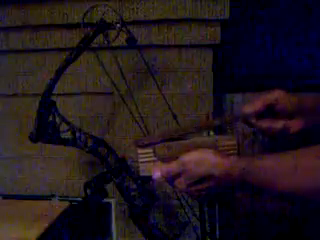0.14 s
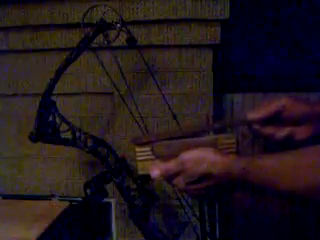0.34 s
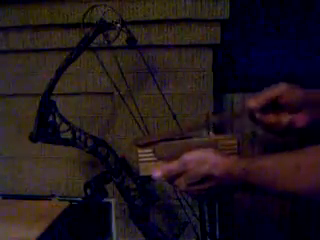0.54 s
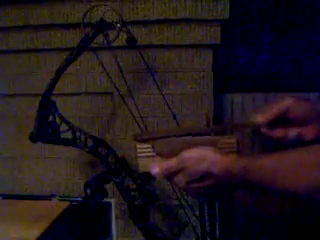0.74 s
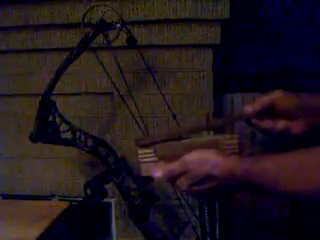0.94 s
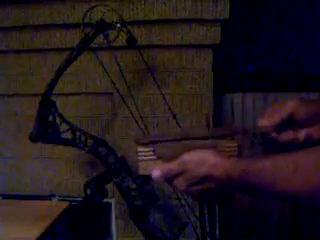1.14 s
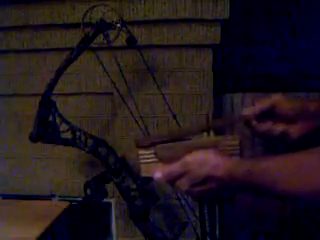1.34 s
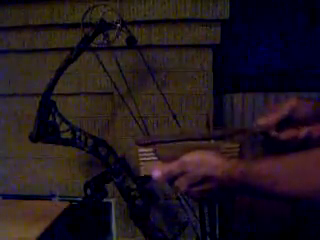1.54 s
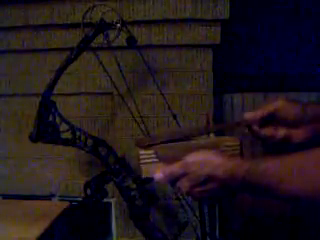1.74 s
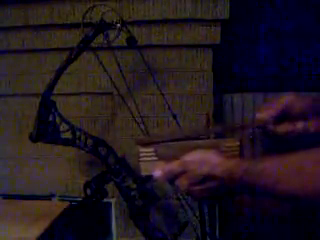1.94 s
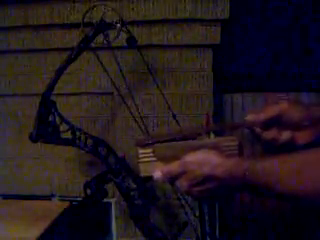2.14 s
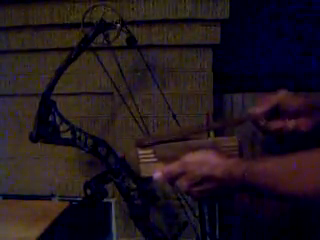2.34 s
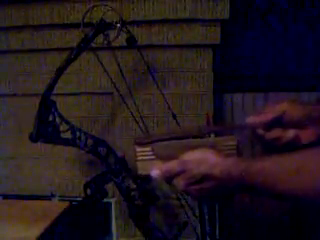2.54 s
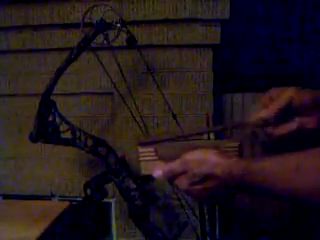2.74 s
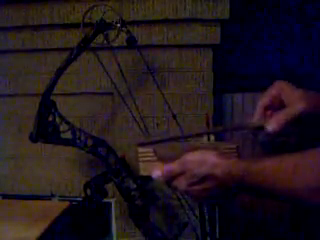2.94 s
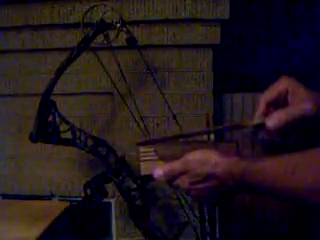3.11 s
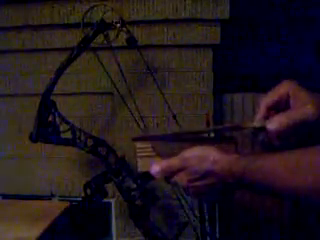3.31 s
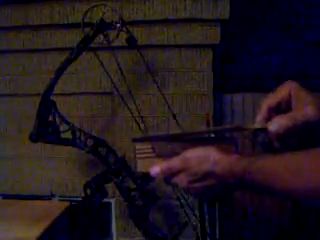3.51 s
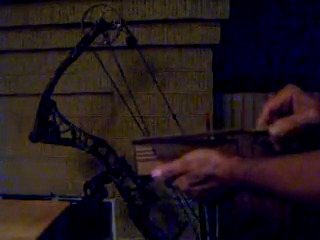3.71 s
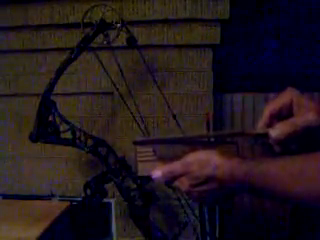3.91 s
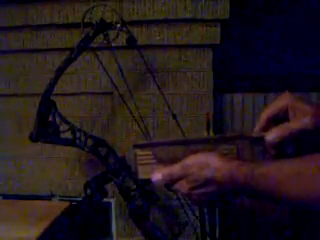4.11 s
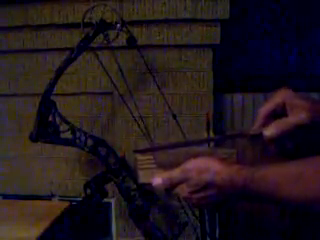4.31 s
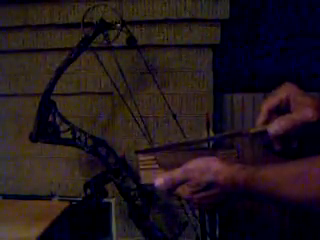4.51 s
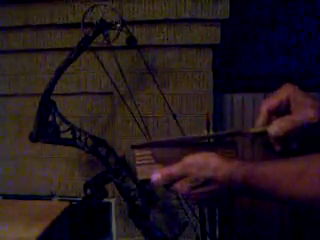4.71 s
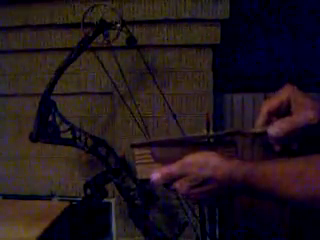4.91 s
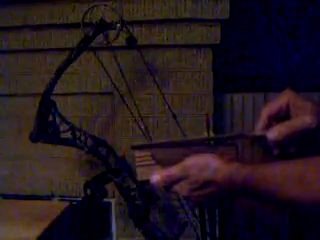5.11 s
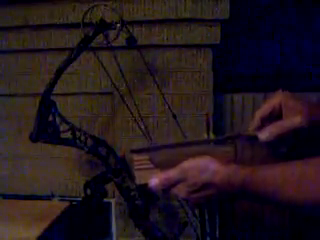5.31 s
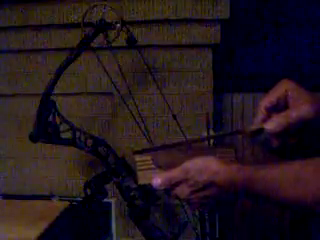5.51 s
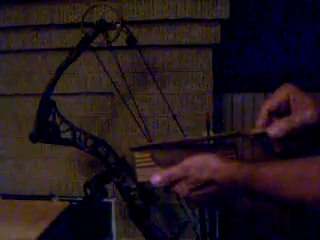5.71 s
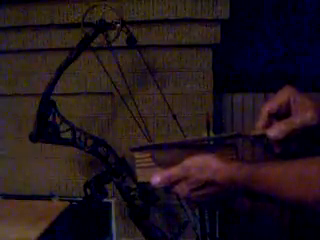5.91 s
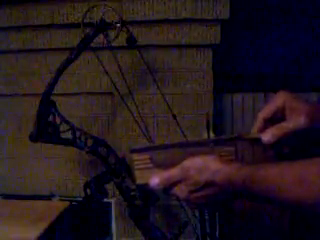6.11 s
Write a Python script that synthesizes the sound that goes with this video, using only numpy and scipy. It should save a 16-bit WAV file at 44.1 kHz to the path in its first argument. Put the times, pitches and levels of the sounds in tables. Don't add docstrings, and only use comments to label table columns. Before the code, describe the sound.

Wooden box call yelps loudly eight times in quick rhythm, each ending in a rasp, then slow scrapes stutter into chirps and short yelps.

```python
import sys
import numpy as np
from scipy import signal
from scipy.fft import rfft, irfft
from scipy.io import wavfile
from scipy.ndimage import uniform_filter1d

SR = 44100
rng = np.random.default_rng(int(sys.argv[2]) if len(sys.argv) > 2 else 0)


def transcribe(signal):
    frames = np.atleast_2d(signal).T
    limited = np.clip(frames, -1, 1)
    pcm = np.round(limited * 32767).astype(np.int16)
    wavfile.write(sys.argv[1], SR, pcm)


def boost_factor(decibels):
    exponent = np.asarray(decibels, float) / 20
    return 10 ** exponent


N = 271215
T = np.arange(N) / SR

# (time [s], strength [dB], slip rate as the lid grips [Hz], while it holds [Hz], at the rim [Hz])
FULL_YELPS = [(0.37, -4.5, 780.8, 795, 845), (0.773, -4, 776.6, 798, 779), (1.137, -4.5, 790.7, 790, 763),
              (1.479, -3.5, 788.5, 799, 785), (1.848, -5, 787.7, 787, 763), (2.214, -4.5, 787.3, 780, 763),
              (2.593, -5, 775, 777, 758)]
# (tone re strength [dB], then re the tone: third partial [dB],
# higher overtones [dB], lowest partial [dB])
YELP_STAGES = [
    (-23, -23.5, -27.5, -19.5),
    (-10.5, -18, -32, -24),
    (-2.5, -14.5, -34, -27),
    (-0.5, -14.5, -30.5, -24),
    (-2, -13, -17.5, -14.5),
    (-4, -9, -11, -11),
    (-13.5, -9, -7, -10.5),
]
# (time [s], wall tone [Hz], level [dB])
QUICK_YELPS = [
    [(0.0, 1697, -4), (0.014, 1661, -6), (0.034, 1723, -10.5), (0.066, 1691, -13), (0.09, 1727, -21)],
    [(4.142, 1691, -32), (4.15, 1707, -10.5), (4.156, 1696, -7), (4.184, 1778, -15), (4.202, 1618, -10.5),
     (4.225, 1659, -21.5)],
    [(5.254, 1790, -24.5), (5.268, 1683, -7), (5.286, 1712, -8), (5.3, 1732, -18), (5.324, 1611, -10.5),
     (5.35, 1697, -22), (5.36, 1612, -20)],
    [(6.1, 1817, -34), (6.11, 1736, -11.5), (6.118, 1727, -8), (6.14, 1810, -28)],
]
# (share of the length, then re the tone: third partial [dB], higher overtones [dB],
# lowest partial [dB])
QUICK_STAGES_DB = [(0, -14.5, -23, -18), (0.199, -6, -18, -13.5), (0.699, -3.5, -5, -16.5),
                   (1, -9, -9, -10.5)]
QUICK_BITES_DB = [-2.5, 1, 3.5, -4.5]
# (time [s], peak level [dB], rise over 5 dB [ms], fall over 5 dB [ms])
STUTTER_CHIRPS = [(3.78, -30.5, 6, 10), (3.81, -21.5, 18, 10), (3.856, -15.5, 14, 6),
                  (3.926, -13.5, 11, 4.5), (3.95, -20, 9.1, 14.5), (3.974, -11, 8, 5),
                  (4.017, -8.6, 8, 9.5), (4.059, -7.5, 3.1, 11), (4.101, -12, 4, 3), (4.117, -12, 8.7, 3.5),
                  (4.973, -26, 16, 20.5), (5.01, -29.5, 8.1, 10.5), (5.028, -16, 7.4, 6.5),
                  (5.087, -15, 3.9, 21), (5.129, -12, 7.3, 10), (5.155, -14.5, 9.5, 10.5),
                  (5.182, -11, 13, 4.5), (5.226, -8.6, 7, 6), (5.238, -11.5, 9.3, 3), (5.877, -32, 10, 11),
                  (5.971, -17.5, 13, 11), (6.013, -14.5, 13, 10), (6.053, -15, 15, 6.5),
                  (6.081, -13, 7.3, 3), (6.151, -8.6, 7, 9)]
# (time [s], peak level [dB])
FAINT_TOUCHES = [(1.123, -32), (2.582, -27), (3.664, -36), (3.70, -55), (3.726, -41), (3.738, -38.5),
                 (3.889, -42), (4.796, -51), (4.95, -40.5), (5.064, -39), (5.913, -46.5)]
# (time at the slow rate [s], time at the fast rate [s])
SLOW_STROKES = [(3.79, 4.11), (4.97, 5.22), (5.86, 6.08)]
# (multiple of the slip rate, level [dB], share of the bite it follows)
SLIP_OVERTONES = [(3, -0.5, 1.03), (4, 2, 0.92), (5, -8, .9), (6, -8.5, 0.69), (7, -19, 1.54),
                  (8, -20.5, 0.97), (9, -27.5, 0.87)]
# (frequency [Hz], level [dB per Hz])
CHALK_COLOUR = [(500, -40), (900, -19.5), (1400, -12), (2100, 3.5), (3000, -9), (4500, -7), (6500, -7.5),
                (8000, -17.5)]
# (start [s], end [s], level [dB], roughness [0-1])
SKIDS = [(0.065, 0.105, -18, 0.4), (0.511, 0.561, -22.5, .6), (0.856, 0.907, -16, .9),
         (1.203, 1.252, -13, 1), (1.573, 1.627, -19, 0.8), (1.93, 1.991, -15.5, .9),
         (2.298, 2.358, -17, 0.8), (2.667, 2.721, -14.5, 1.1), (4.203, 4.249, -28.5, .35),
         (5.331, 5.381, -33, .25)]
# (frequency [Hz], width [Hz], level [dB])
BOX_MODES = [(843.7, 25, -17.5), (1126, 130, -5.5), (1340, 140, -2.5), (1612, 160, 1), (2635, 150, -2),
             (2860, 270, 1.5), (3838, 210, -6.5), (5240, 170, -13), (6470, 900, -14.5)]
# (time [s], peak level [dB], pitch [Hz])
LOW_BURSTS = [(0.0919, -8.5, 1390), (0.099, -7.5, 1450), (0.5501, -12, 1353), (0.5548, -7.5, 1369),
              (0.898, -6, 1320), (0.9081, -10, 1288), (1.242, -2.5, 1350), (1.2565, -13, 1120),
              (1.614, -7, 1320), (1.6222, -11.5, 1244), (1.9619, -5, 1202), (1.9668, 0, 1339),
              (1.9775, -0.5, 1340), (2.342, -9, 1450), (2.354, -7.5, 1310), (2.7032, -9, 1308),
              (2.7118, -3, 1313), (2.7173, -2.5, 1368)]
# (time [s], peak level [dB], hollow part re the peak [dB])
LID_TAPS = [(0.316, -31.5, -12), (0.7735, -4.5, -10), (1.1117, -16.5, -3), (1.477, -16, 4.5),
            (1.8365, -19.5, -7), (2.208, -18, -1), (2.5635, -12.5, -5.5), (5.7456, -32.5, -3.5),
            (5.7662, -38.5, -6.5)]
# (frequency [Hz], width [Hz], level [dB])
LID_MODES = [(1785, 210, 7), (2886, 180, -12), (3520, 310, -12), (5895, 650, -13), (6800, 330, -20.5)]
# (frequency [Hz], width [Hz], level [dB])
HOLLOW_MODES = [(960, 900, -9.5), (1350, 220, 3.5)]
# (frequency [Hz], time to fall 60 dB [s])
ROOM_DECAY = [(500, 0.19), (1500, 0.23), (3000, 0.22), (5500, 0.2), (8000, 0.27)]
# (delay [ms], level [dB])
WALL_ECHOES = [(4.1, -26), (9.7, -25), (16.3, -22), (21.9, -21), (28.5, -21)]
# (frequency [Hz], level [dB per Hz])
HISS_COLOUR = [(56, -45), (95, -10), (172, -8), (268, -14), (451, -12.5), (759, -18), (948, -20),
               (1850, -25), (4260, -30), (8000, -32), (10400, -64), (17600, -120)]
# (frequency [Hz], level [dB])
MAINS_HUM = [(58.5, -38), (175, -63.5)]
# (time [s], level [dB])
GRIP_RUMBLE = [(4.7, -63), (4.91, -47), (5.399, -38.5), (5.68, -40), (6.15, -37.5)]
# (time [s], level [dB])
HAND_BUMPS = [(5.446, -43.5), (5.769, -30.5), (5.988, -45)]
# (frequency [Hz], level [dB per Hz])
HAND_COLOUR = [(12, -30.5), (20, 2), (65, -0.5), (81, -9), (134, -3.5), (255, -9), (497, -25.5),
               (700, -45.5), (910, -67.5), (1540, -120)]


def evened(x):
    return x / np.sqrt(np.mean(x ** 2) + 1e-20)


def read(points, hz):
    f, value = np.transpose(points)
    return np.interp(np.log(hz + 1), np.log(f + 1), value)


def drift(ms):
    size = max(int(ms * SR / 1000), 2)
    once = uniform_filter1d(rng.standard_normal(N), size)
    return evened(uniform_filter1d(once, size))


def coloured(points):
    hz = np.fft.rfftfreq(N, 1 / SR)
    return evened(irfft(rfft(rng.standard_normal(N)) * boost_factor(read(points, hz)), N))


def ring(x, modes):
    t = T[:1500]
    shape = sum(boost_factor(db) * np.exp(-np.pi * width * t) * np.sin(2 * np.pi * hz * t) for hz, width, db in modes)
    return signal.oaconvolve(x, shape * (1 - np.exp(-t / 0.0031)))[:N]


def squeal(share):
    level, hz, third_db, bite_db, low_db = strokes()
    steady = np.cumsum(hz * (1 + 0.0022 * drift(4))) / SR
    turns = steady + np.cumsum(hz * 0.025 * share * drift(1.5)) / SR
    effort_db = 20 * np.log10(np.clip(level, 0.01, 0.5) / 0.42)
    tone = boost_factor(0.5 * drift(2.1) + 4.0 * share * drift(2.8)) * np.cos(4 * np.pi * turns)
    lowest = np.sin(2 * np.pi * steady + 0.025 * drift(14))
    tone += boost_factor(low_db - 0.25 * effort_db + 0.53 * drift(11)) * lowest
    for k, db, follows in SLIP_OVERTONES:
        sharpness_db = third_db if k == 3 else bite_db
        over_db = db - 23.5 + follows * (sharpness_db + 23) + (2.4 + 3.0 * share) * drift(6.1)
        over_db += 0.02 * (k - 3) * effort_db
        late = (round(k) % 2 + 2 * (k == 6)) * np.pi / 2
        tone += boost_factor(over_db) * np.cos(2 * np.pi * round(k) * turns - late + 0.46 * drift(19))
    chalk_db = -21 + 0.29 * bite_db + 0.04 * effort_db + 11.0 * share + 0.45 * drift(2.6)
    chalk = boost_factor(chalk_db) * coloured(CHALK_COLOUR)
    return level * (chalk - np.sqrt(2) * tone)


def strokes():
    dead_hz, dead_width_hz = 798, 7
    level, controls = chirps()
    for s, db, *rest in full_yelps(dead_hz) + quick_yelps():
        db = db + 1.3 * np.maximum(db + 8, 0)
        edge = np.clip(np.minimum(T - s[0] + 0.0049, s[-1] + 0.0089 - T) / 0.0079, 0, 1)
        level += edge ** 2 * boost_factor(np.interp(T, s, db))
        controls += list(zip(s, *rest))
    s, *columns = np.transpose(sorted(controls))
    hz, third_db, bite_db, low_db = (uniform_filter1d(np.interp(T, s, c), size=200) for c in columns)
    dead = np.exp(-((hz - dead_hz) / dead_width_hz) ** 2)
    slack_hz = np.maximum(dead_hz - hz, 0)
    third_db = third_db - 17 * dead + 0.0877 * slack_hz
    bite_db = bite_db - 4 * dead + 0.3713 * slack_hz
    return level, hz, third_db, bite_db, low_db


def full_yelps(dead_hz):
    touch_hz, settle_hz = 856.4, 14
    jump_hz, top_hz, last_hz = 58.06, 848, 810
    stage_db, third_db, bite_db, low_db = np.transpose(YELP_STAGES)
    rubs = []
    for (start, db, gripped, held, rim), (skid_s, end, *_) in zip(FULL_YELPS, SKIDS[1:]):
        grip = start + 0.24 * (skid_s - start)
        s = [start, (start + grip) / 2, grip, (grip + skid_s) / 2, skid_s, skid_s + 0.017, end - 0.014]
        broken = min(rim + jump_hz, top_hz)
        hz = np.array([touch_hz, gripped + settle_hz, gripped, held, rim, broken, last_hz])
        rubs.append((s, db + stage_db, hz, third_db, bite_db, low_db + 0.012 * (hz - dead_hz)))
    return rubs


def quick_yelps():
    share, *colour = np.transpose(QUICK_STAGES_DB)
    rubs = []
    for yelp, more_db in zip(QUICK_YELPS, QUICK_BITES_DB):
        s, hz, db = np.transpose(yelp)
        along = (s - s[0]) / (s[-1] - s[0])
        third_db, bite_db, low_db = (np.interp(along, share, c) for c in colour)
        rubs.append((s, db, hz / 2, third_db + more_db, bite_db + more_db, low_db))
    return rubs


def chirps():
    slow_hz, fast_hz, slow_bite_db, fast_bite_db = 832, 872.4, -22.5, -13
    low_db = -20
    level, controls = np.zeros(N), []
    touches = [(*row, 7, 6) for row in FAINT_TOUCHES]
    for s, db, rise_ms, fall_ms in STUTTER_CHIRPS + touches:
        slow, fast = min(SLOW_STROKES, key=lambda stroke: abs(sum(stroke) / 2 - s))
        speed = np.clip((s - slow) / (fast - slow), 0, 1)
        hz = slow_hz + (fast_hz - slow_hz) * speed
        bite_db = slow_bite_db + (fast_bite_db - slow_bite_db) * speed ** 2.7
        near = slice(int((s - 0.07) * SR), int((s + 0.07) * SR))
        ms = (T[near] - s) * 1000
        loss_db = 5 * np.where(ms < 0, abs(ms / rise_ms) ** 1.86, abs(ms / fall_ms) ** 2.4)
        level[near] += boost_factor(min(db, -8.6) - loss_db)
        controls.append((s - rise_ms / 1000, hz * 0.99, bite_db + 2.5, bite_db - 7.0, low_db))
        controls.append((s + fall_ms / 1000, hz * 1.013, bite_db - 0.5, bite_db - 5.5, low_db))
    return level, controls


def skid():
    share, level = np.zeros(N), np.zeros(N)
    for start, end, db, rough in SKIDS:
        ramp = np.clip(np.minimum((T - start) / 0.013, (end - T) / 0.006), 0, 1)
        share += ramp * rough
        level += ramp * boost_factor(db)
    return share, level


def rasp(level):
    slips = (rng.random(N) < 2500 / SR) * rng.standard_normal(N) * boost_factor(2.5 * drift(2.5))
    return ring(slips * level, BOX_MODES) / np.sqrt(np.mean(ring(slips, BOX_MODES) ** 2))


def low_note():
    half_ms = 2.9
    out, t = np.zeros(N), T[:1200] - T[600]
    for (s, db, hz), phase in zip(LOW_BURSTS, rng.random((len(LOW_BURSTS), 2)) * 2 * np.pi):
        turns = hz * t * (1 - 2.6 * t)
        note = np.sin(2 * np.pi * turns + phase[0])
        note += boost_factor(-12) * np.sin(2 * np.pi * 2.25 * turns + phase[1])
        out[int(s * SR) - 600:][:1200] += boost_factor(db) * np.exp(-(t * 1000 / half_ms) ** 2) * note
    return out


def taps():
    bounces = [(-1.45, -2.7), (0.65, -0.5), (4.0, -3.1)]  # (delay [ms], level [dB])
    blows = np.zeros((2, N))
    for (s, db, hollow_db), chance in zip(LID_TAPS, rng.uniform(0.41, 1, (len(LID_TAPS), 3))):
        for bounce, (ms, bounce_db) in zip(chance, bounces):
            at = int((s + (ms + 0.3 * bounce) / 1000) * SR)
            blows[:, at] += boost_factor([0, hollow_db]) * boost_factor(db + bounce_db + 5.5)
    return ring(blows[0], LID_MODES) + ring(blows[1], HOLLOW_MODES)


def room(x, spread):
    tail = np.zeros(SR // 2)
    at = np.arange(300, len(tail) - 12, 12)
    tail[at + rng.integers(0, 12, len(at))] = rng.choice([-1., 1.], len(at))
    hz, t, z = signal.stft(tail, SR, nperseg=256)
    fading = z * boost_factor(-60 * t / read(ROOM_DECAY, hz)[:, None])
    tail = signal.istft(fading, SR, nperseg=256)[1]
    tail *= np.minimum(T[:len(tail)] / 0.035, 1) ** 2
    tail *= boost_factor(-12.5) / np.linalg.norm(tail)
    for ms, db in WALL_ECHOES:
        tail[int(ms * SR / 1000)] += boost_factor(db)
    return x + signal.fftconvolve(spread, tail)[:N]


def background():
    hum = sum(np.sqrt(2) * boost_factor(db + 2.1 * drift(30)) * np.sin(2 * np.pi * hz * T) for hz, db in MAINS_HUM)
    s, db = np.transpose(GRIP_RUMBLE)
    hand = boost_factor(np.interp(T, s, db, left=-75))
    for at, peak_db in HAND_BUMPS:
        hand += boost_factor(peak_db) * np.exp(-((T - at) / 0.028) ** 2)
    rumble = coloured(HAND_COLOUR + [(1500, -71.5)]) * hand * boost_factor(0.7 * drift(13))
    hiss = boost_factor(-49 + 1.4 * drift(40)) * coloured([(20, 3.0), (45, -11.5)] + HISS_COLOUR[1:])
    return hum + rumble + hiss


def scene():
    share, level = skid()
    beamed = squeal(share)
    knocks = rasp(level) + low_note() + taps()
    return (room(beamed + knocks, beamed + boost_factor(2) * knocks) + background())[None]


def band_limit(x):
    return signal.sosfilt(signal.butter(12, 15940, fs=SR, output="sos"), x)


def record(dry):
    slow = signal.resample_poly(dry, 160, 441, axis=1)
    slow = np.clip(slow, -0.72, 0.72)
    edge = signal.firwin(441 * 30 + 1, 1.02 / 441, window=("kaiser", 10))
    fast = signal.resample_poly(slow, 441, 160, axis=1, window=edge)[:, :N]
    fast = np.pad(fast, ((0, 0), (0, N - fast.shape[1])))
    mix = np.clip(fast, -0.725, 0.725) + 0.0006
    return band_limit(mix)


dry = scene()
out = record(dry)
transcribe(out)
```